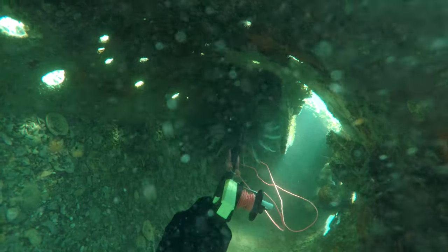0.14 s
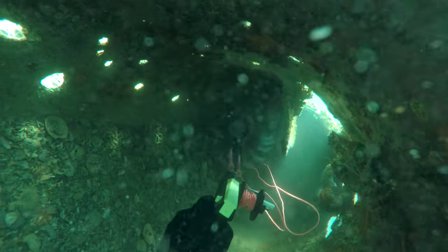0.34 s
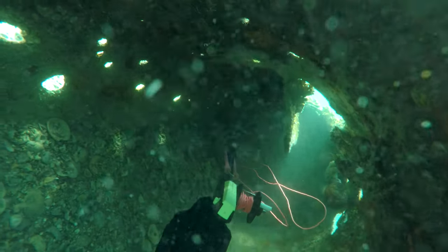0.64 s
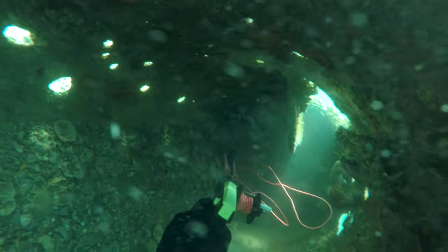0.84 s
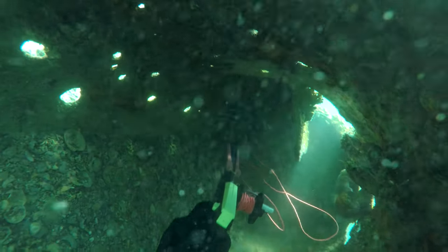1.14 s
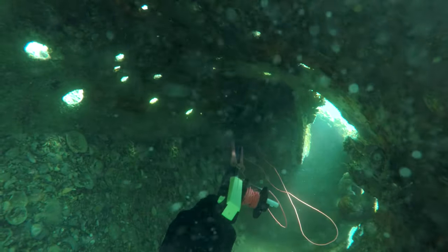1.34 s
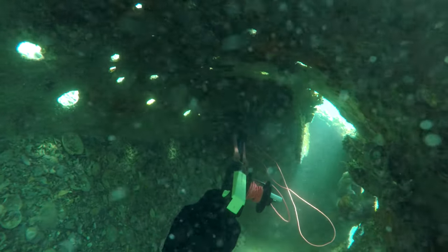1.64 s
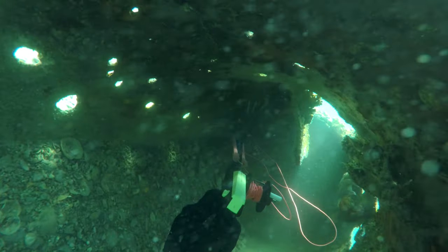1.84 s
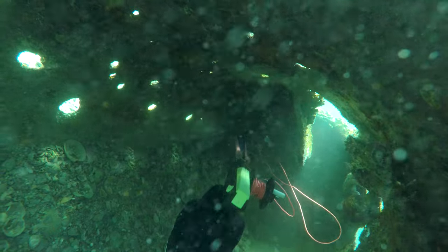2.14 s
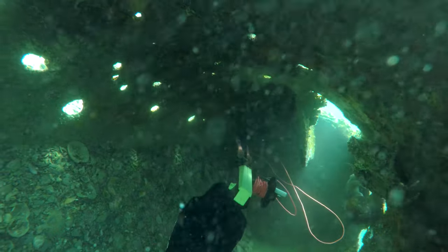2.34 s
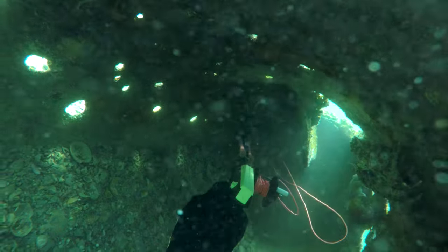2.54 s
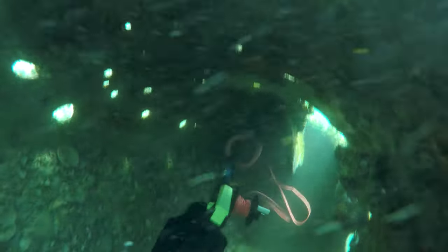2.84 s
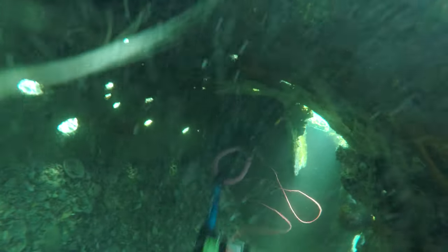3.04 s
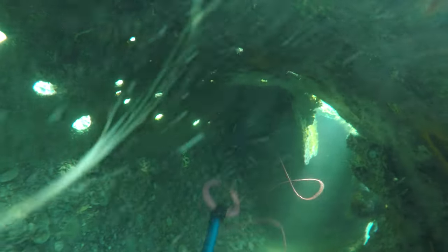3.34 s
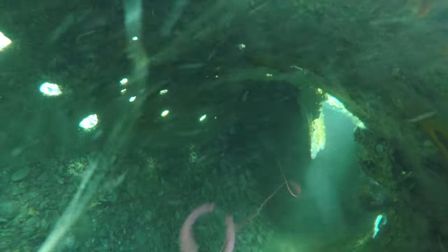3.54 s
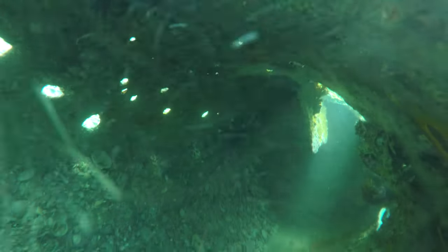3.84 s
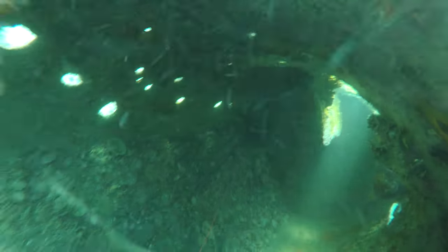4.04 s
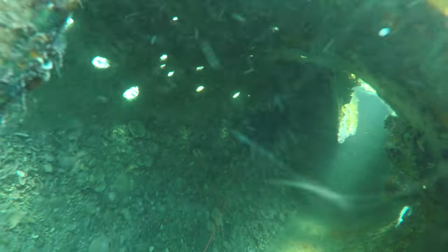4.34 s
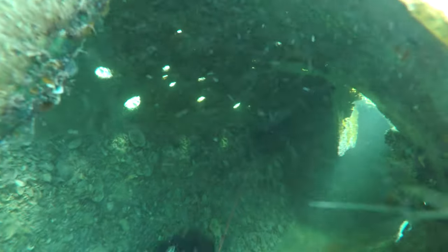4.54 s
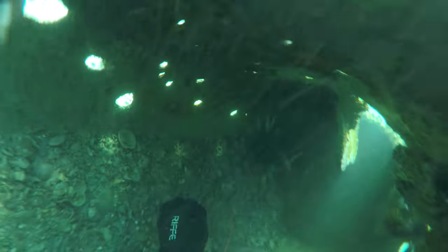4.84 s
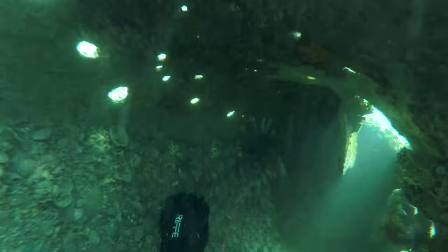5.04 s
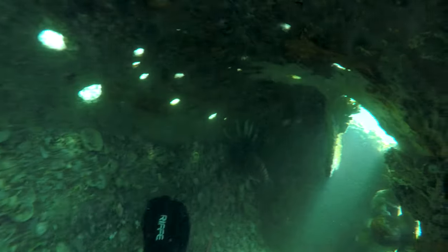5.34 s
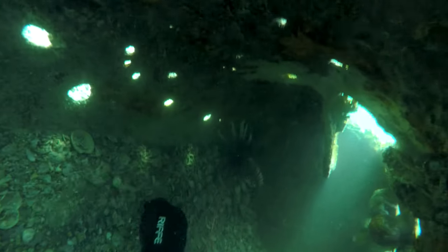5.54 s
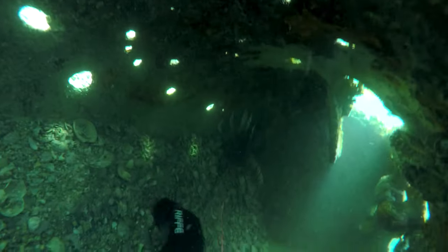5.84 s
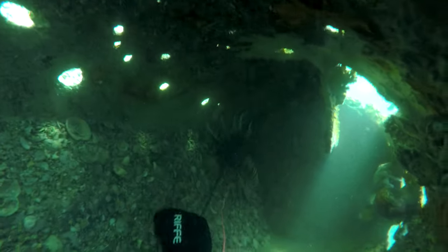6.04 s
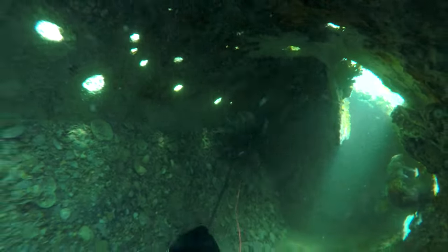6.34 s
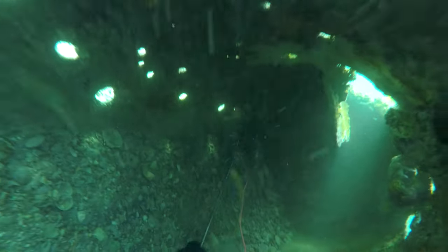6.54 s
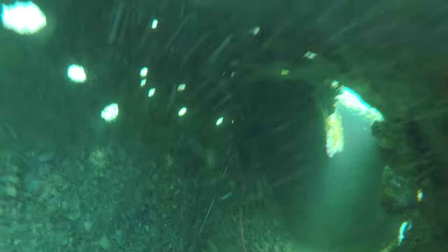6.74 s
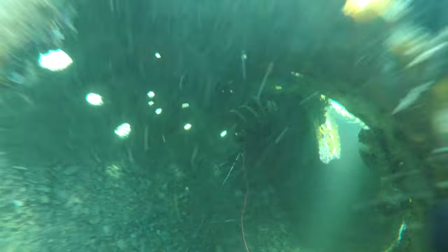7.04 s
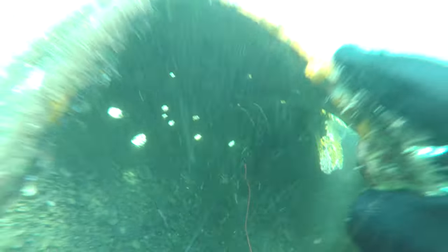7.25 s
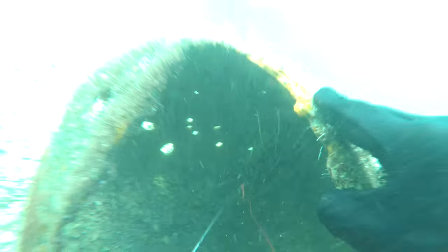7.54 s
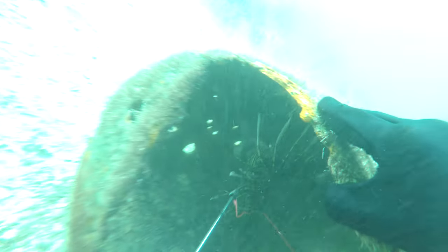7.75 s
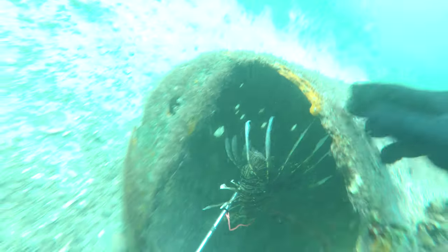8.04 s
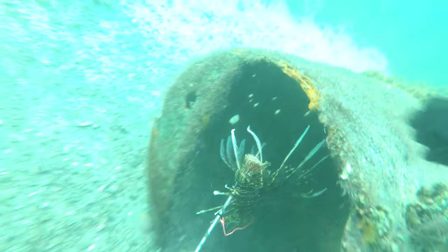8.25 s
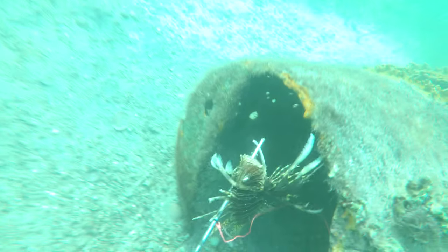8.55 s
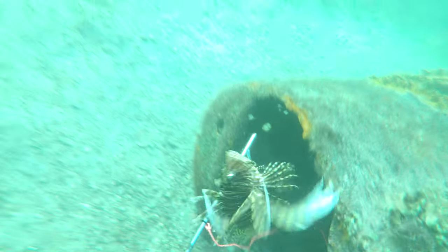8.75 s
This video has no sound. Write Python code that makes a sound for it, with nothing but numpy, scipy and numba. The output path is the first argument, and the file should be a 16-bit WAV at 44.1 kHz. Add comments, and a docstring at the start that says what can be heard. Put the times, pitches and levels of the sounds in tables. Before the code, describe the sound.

Muffled rattling engine drone heard through a diver's camera housing, split by one violent spear shot, followed by surging low water and scattered knocks.

```python
"""A boat engine idling nearby knocks and clatters, heard from inside a diver's camera housing at a sunken pipe.
Pulses of noise and short rings repeat each engine cycle and excite the housing's resonances; the sea crackles.
Filtered noise makes the rumble of water and the rubbing of gear; damped swings make throbs, knocks and squeaks.
Just after the sling's crack, the spear's impact is so loud that the camera's limiter ducks everything and lets
it back slowly; the spear rings on as decaying sine modes."""
import sys
import numpy as np
from scipy import signal
from scipy.fft import rfft, irfft
from scipy.io import wavfile
from scipy.ndimage import uniform_filter1d, minimum_filter1d
from numba import njit

SR = 44100
rng = np.random.default_rng(int(sys.argv[2]) if len(sys.argv) > 2 else 0)


def unload_wav(signal):
    """Save mono or channel-first audio to the path in sys.argv[1] as 16-bit WAV at rate SR, clipped to [-1, 1]."""
    wavfile.write(
        sys.argv[1],
        SR,
        np.round(np.clip(np.atleast_2d(signal).T, -1, 1) * 32767).astype(np.int16),
    )


N = 391608
TIME = np.arange(N) / SR
FREQ = np.fft.rfftfreq(N, 1 / SR) + 0.00081  # the offset keeps 0 Hz out of divisions and logarithms
SIDES = np.array([[.5], [-.5]])  # splits a difference evenly between left and right microphone


def undb(db):
    """Decibels to gain."""
    return 10 ** (np.asarray(db) / 20)


def curve(table, axis=1):
    """One column of a timed table, at every sample."""
    rows = np.array(table)
    return np.interp(TIME, rows[:, 0], rows[:, axis])


def unit(x):
    """Scale so that the middle of the stereo image has rms 1."""
    return x / np.std(np.atleast_2d(x).mean(axis=0))


def band(lo_hz, hi_hz, order=16):
    """Gain of a band-pass at every frequency; a higher order is steeper."""
    return 1 / np.sqrt((1 + (lo_hz / FREQ) ** order) * (1 + (FREQ / hi_hz) ** order))


def shape(x, response):
    """Filter by a frequency response."""
    return irfft(rfft(x) * response, N)


def add(track, s, sound):
    """Mix a sound in at time s."""
    i = max(int(s * SR), 0)
    track[i:i + len(sound)] += sound[:max(N - i, 0)]


def walk(rate):
    """Slow random wandering with a spread of 1, mostly below the rate in Hz."""
    slow = shape(rng.standard_normal(N), 1 / (1 + (FREQ / rate) ** 2) ** 2)
    return slow / np.std(slow)


def knock(hz, rise):
    """A few swings that swell and are quickly damped by the water."""
    t = TIME[:SR // 5]
    envelope = (t / rise) ** 2 * np.exp(2 - 2 * t / rise)
    return envelope * np.sin(2 * np.pi * hz * t)


# resonances of the housing at the two microphones:
# (centre [Hz], width [Hz], level [dB], left minus right [dB], phase by which left leads [rad])
HOUSING = [(314, 84, -24.2, -12.2, -1.4), (374, 113, -13.1, -2.8, 0.7), (516, 48, -3.2, -0.2, 0.8),
           (633, 113, -8.0, 3.1, -0.2), (756, 115, -10.6, -20.9, 3.1), (860, 38, -4, -8.7, 2.8),
           (945, 65, -6.2, -3.0, 2.6), (1028, 52, -3.3, -1.8, 2.3), (1219, 49, -13.8, -8.0, 2.7),
           (1560, 115, -7, 1.7, 2.6), (1680, 185, -5.3, -2.9, 2.0), (1950, 190, -14.5, 1.9, 2.2),
           (2150, 88, -8.5, -0.4, 1.7), (2329, 80, -10.5, -0.9, 1.3), (2485, 150, -16.5, 12, -0.3),
           (2688, 280, -20.2, -9.4, -2.0), (3168, 391, -27.6, 1.1, 1.1), (3744, 853, -28.2, -4.4, 0.5),
           (5313, 492, -35.5, -2.1, 1.5), (6251, 845, -39.3, -0.1, -4.6), (7397, 861, -38.6, 3.8, -1.5),
           (9226, 2608, -43.9, -6.1, -1.6), (12475, 1575, -58.1, 4.0, 4.5)]


def housing():
    """Left and right microphone responses: each resonance reaches them with its own strength and phase."""
    left, right, cross = 0, 0, 0
    grid = np.linspace(0, SR / 2, 4096)
    for hz, width, db, pan_db, lead in HOUSING:
        power = undb(db) ** 2 / (1 + 2 * ((grid - hz) / width) ** 2) ** 2
        left = left + power * undb(pan_db)
        right = right + power / undb(pan_db)
        cross = cross + power * np.exp(1j * lead)
    phase = np.unwrap(np.angle(cross))
    left, right, lead = (np.interp(FREQ, grid, v) for v in (left, right, phase))
    return np.sqrt([left, right]) * np.exp(1j * SIDES * lead)


# knocks within one engine cycle: (place in the cycle [0-1], length [cycles], body level [dB],
# clatter level [dB], treble level [dB], nominal ring [Hz], ring against noise [dB])
CYCLE = [(.003, 0.0061, -12, -10, 10.5, 4130, 8), (.075, 0.024, -7, 3, 13.5, 4470, -7.5),
         (.18, 0.024, 5, 6.5, 5.5, 2616, -4), (.28, 0.011, -4, 1, 3, 3900, 2),
         (.355, 0.014, 3, 7.5, 9, 2306, -4.5), (.41, 0.013, -3.5, 9.5, 12, 4210, 0.5),
         (.51, 0.031, 4, 3.5, 5.5, 2334, -2.5), (.62, 0.016, 1.5, -0.5, -10, 1680, 3),
         (.7, 0.025, 3, 3, 10, 3650, -17), (.815, 0.016, -1.5, 8, 11.5, 3743, 1.5),
         (.865, 0.014, 8, -0.5, 6.5, 2096, 1.5)]
BETWEEN_STROKES_DB = -5.5  # noise between the strokes, on the scale of the cycle's levels
# scatter of each stroke's time [cycles] and pitch [ratio], and how fast its ring rises [ratio per s]
STROKE_JITTER, STROKE_DETUNE, STROKE_GLIDE_PER_S = .003, .03, 12


def rattle(cycles, bend, ring_db, axis, scatter_db=1.1, repeat=0.55):
    """Noise flares with a short rising ring at each knock; strokes differ in exact time, size and pitch."""
    chance = rng.standard_normal((int(cycles[-1]) + 3, len(CYCLE), 4))
    power = np.full(N, undb(BETWEEN_STROKES_DB) ** 2)
    rings = np.zeros(N)
    cycle_s = TIME[-1] / cycles[-1]
    for k, row in enumerate(CYCLE):
        place, length, hz, own_ring_db = row[0], row[1], row[5], row[6]
        nearest = np.rint(cycles - place)
        offset = cycles - place - nearest
        near = np.abs(offset) < .2
        size, phase, late, pitch = chance[nearest[near].astype(int), k].T
        since = offset[near] - STROKE_JITTER * late
        stroke = undb(row[axis] + scatter_db * size) * np.exp(-(since / (2 * length)) ** 2)
        t = since * cycle_s
        ring_hz = hz * bend[near] * (1 + STROKE_DETUNE * pitch)
        turns = ring_hz * (t + STROKE_GLIDE_PER_S * t ** 2 / 2)
        power[near] += stroke ** 2
        rings[near] += undb(ring_db + own_ring_db) * stroke * np.sin(2 * np.pi * (turns + phase))
    # part of the noise repeats in every cycle, the rest is always new
    count = int(N / cycles[-1])
    same = rng.standard_normal(count)[(cycles % 1 * count).astype(int)]
    share = np.clip(repeat, 0, 1)
    noise = np.sqrt(share) * same + np.sqrt(1 - share) * rng.standard_normal(N)
    return rings + np.sqrt(power) * noise


# echoes off the pipe wall and the sea bed: (nominal delay [s], level [dB])
ECHOES = [(.0027, -10), (.0083, -12), (.0118, -14)]
# the drone's colour slides as the diver leaves the pipe:
# (time [s], pitch of the resonances [ratio], length of the echo paths [ratio])
SLIDE = [(0, 1.007, 1), (2.5, 0.9996, 1.024), (4.5, 1.004, .98), (6.5, 0.999, 1.01), (7.3, 0.992, .96),
         (8.2, 1.004, 1.007), (8.85, 0.972, 0.84)]


def echoes(x, sway=0.018):
    """Echo paths drift as the diver sways and shorten on the way out, so fine ridges slope through the drone."""
    path = curve(SLIDE, axis=2)
    out = x
    for delay, db in ECHOES:
        delays = delay * path * (1 + sway * walk(0.38))
        out = out + undb(db) * np.interp(TIME - delays, TIME, x)
    return out


def wavering(x, response, ratio):
    """Filter by a two-channel response whose resonances all slide by a pitch ratio, by bending time and back."""
    clock = np.cumsum(ratio)
    clock = clock * TIME[-1] / clock[-1]
    rung = shape(np.interp(TIME, clock, x), response)
    return np.array([np.interp(clock, TIME, side) for side in rung])


# the heavy knock of each cycle comes and goes as the diver moves:
# (time [s], level [dB], place in the cycle [0-1])
POUND = [(0, -24, .51), (.55, -14, .525), (1.1, -13.5, .52), (1.45, -27, .5), (1.85, -24, .51),
         (2.3, -13.5, .5), (3.3, -23, .49), (4.1, -20, .5), (4.6, -11.5, .505), (5.1, -14.5, .52),
         (5.7, -21.5, .5), (6.4, -15, .5), (7.1, -26, .53), (7.6, -27, .56), (8.15, -19, .58),
         (8.85, -21, .56)]
# the heavy knock and the weaker ones after it: (delay [cycles], level [dB])
POUND_STROKES = [(0, 0), (.115, -8), (.675, -9)]
POUND_HZ, POUND_RISE_S = 940, .002  # nominal pitch, time to the peak


def pounding(cycles, ears, scatter_db=2.0, detune=.025, pan_db=-5.5):
    """One heavy, hollow damped knock a cycle with its weaker followers: the beat of the idle."""
    out = np.zeros(N)
    times, levels, places = np.transpose(POUND)
    chance = rng.standard_normal((int(cycles[-1]) + 1, len(POUND_STROKES), 2))
    for k, strokes in enumerate(chance):
        now = np.interp(k + .5, cycles, TIME)
        db, place = np.interp(now, times, levels), np.interp(now, times, places)
        for (later, stroke_db), (size, pitch) in zip(POUND_STROKES, strokes):
            peak_s = np.interp(k + place + later, cycles, TIME, right=N / SR + 1)
            gain = undb(db + stroke_db + scatter_db * size)
            add(out, peak_s - POUND_RISE_S, gain * knock(POUND_HZ * (1 + detune * pitch), POUND_RISE_S))
    phase_only = ears / np.abs(ears)
    return shape(out, band(780, 1020, order=24) * phase_only) * undb(SIDES * pan_db)


# engine speed: (time [s], working cycles per second [Hz])
SPEED = [(0.0, 9.592), (1.0, 9.651), (2.0, 9.625), (3.0, 9.569), (4.0, 9.727), (5.0, 9.585), (6.0, 9.605),
         (7.0, 9.591), (8.0, 9.694), (9.0, 9.667)]
# the engine swells and fades as the diver moves, and brightens outside the pipe:
# (time [s], body level [dB], clatter level [dB])
DRONE = [(0, -34, -37.5), (.8, -32, -34.5), (1.85, -34.5, -40), (2.55, -31.5, -35.5), (3.1, -34, -39.5),
         (4.1, -35.5, -40.5), (4.7, -30, -39.5), (6.0, -32, -40), (6.5, -31, -37), (6.95, -36.5, -38.5),
         (7.6, -37.5, -35.5), (8.2, -31.5, -32.5), (8.85, -33.5, -32)]
# upper bands of the engine: (low edge [Hz], high edge [Hz], level against the clatter [dB],
# share of the body's swell [ratio], share of the clatter's swell [ratio])
UPPER = [(1122, 1535, -1.5, 0.65, 0.64), (1940, 3130, 1, 0.024, 1), (2604, 5360, -8, 0.03, 0.55)]
# the rattle's ring drifts, then slides down as the diver leaves the pipe: (time [s], pitch [ratio])
RATTLE_BEND = [(0, 0.98), (2.5, 0.98), (4.4, 0.95), (5.8, 1.04), (6.9, 1.01), (7.6, 0.95), (8.85, 0.73)]
# how strongly the strokes ring against their noise, before each knock's own share
BODY_RING_DB, CLATTER_RING_DB, TREBLE_RING_DB = -12, -8, -7.5
HUM_HZ, HUM_WIDTH_HZ, HUM_DB = 517, 83, -41.5  # a resonance that does not follow the drone's swells
SING_HZ, SING_WIDTH_HZ, SING_DB = 1660, 17, -11  # a narrow resonance, level against the clatter


def engine(ears, fizz_db=-62.0, waver_db=.5, drift=0.01):
    """Body, clatter, treble and heavy beat of the idling engine ring the housing; two resonances sound on."""
    cycles = np.cumsum(curve(SPEED)) / SR
    bend = curve(SLIDE) * (1 + drift * walk(1.8))
    body = echoes(rattle(cycles, bend, BODY_RING_DB, axis=2))
    clatter = echoes(rattle(cycles, bend, CLATTER_RING_DB, axis=3))
    treble = echoes(rattle(cycles, bend * curve(RATTLE_BEND), TREBLE_RING_DB, axis=4))
    body_db, clatter_db = curve(DRONE, axis=1), curve(DRONE, axis=2)
    body_swell = body_db - body_db.mean()
    clatter_swell = clatter_db - clatter_db.mean()
    layers = [(body, band(340, 1005), body_db)]
    for x, (low_hz, high_hz, db, with_body, with_clatter) in zip((clatter, clatter, treble), UPPER):
        swell_db = with_body * body_swell + with_clatter * clatter_swell
        layers.append((x, band(low_hz, high_hz), clatter_db.mean() + db + swell_db))
    hum = (HUM_HZ, HUM_WIDTH_HZ, HUM_DB)
    sing = (SING_HZ, SING_WIDTH_HZ, clatter_db + SING_DB)
    for hz, width, db in (hum, sing):
        layers.append((body, 1 / (1 + ((FREQ - hz) / width) ** 4), db))
    drone = 0
    for x, passed, db in layers:
        drone = drone + unit(wavering(x, ears * passed, bend)) * undb(db + waver_db * walk(1.6))
    fizz = unit(shape(treble, ears * band(5300, 10700))) * undb(fizz_db + clatter_swell)
    return pounding(cycles, ears) + drone + fizz


def crackle(ears, level_db=-58.5, spread_db=1.5):
    """Fine crackle of the sea: noise in grains of random size, different at each microphone."""
    sizes = np.repeat(rng.exponential(size=N // 32 + 1), 32)[:N]
    grains = rng.standard_normal((2, N)) * undb(spread_db * sizes)
    return unit(shape(grains, ears * band(5900, 18000))) * undb(level_db)


# water pushing on the housing as the diver settles, shoots and swims in:
# (time [s], level of the slow swells [dB], level of the eddies [dB])
FLOW = [(0, -28, -34.5), (1.0, -31, -37), (1.8, -37.5, -43), (2.5, -44.5, -48), (3.3, -28, -37),
        (3.7, -23, -36.5), (4.15, -23, -33), (4.75, -15.5, -34), (5.15, -24, -33.5), (7.2, -27.5, -34),
        (8.1, -24.5, -34), (8.85, -29, -33)]
# colour of that rumble: (frequency [Hz], level [dB])
FLOW_COLOUR = [(6, -20), (15, -1), (28, 0), (45, -4), (70, -11), (120, -21), (200, -29), (320, -38),
               (600, -60), (4000, -120)]


def flow(surge_db=-0.3):
    """Slow swells of low noise press on the housing as the diver moves, and smaller eddies churn along it."""
    hz, db = np.transpose(FLOW_COLOUR)
    colour = undb(np.interp(np.log(FREQ), np.log(hz), db))
    swells = unit(shape(rng.standard_normal(N), colour * band(2.8, 41.2)))
    eddies = unit(shape(rng.standard_normal(N), colour * band(50.3, 980)))
    return swells * undb(curve(FLOW) + surge_db * walk(4.2)) + eddies * undb(curve(FLOW, axis=2))


# gear, glove and line rubbing close to the housing, hardest at the shot: (time of the peak [s],
# level [dB], swell time constant [s], fade time constant [s], low edge [Hz], high edge [Hz])
RUBS = [(2.636, -13.5, 0.011, .012, 303, 745), (2.662, 13, 0.003, 0.014, 170, 700),
        (2.73, -14.5, 0.047, 0.05, 54.8, 250), (2.785, -20, 0.0063, 0.015, 175, 800),
        (2.795, -38, .012, 0.012, 1750, 2450), (2.785, -45, .012, .02, 6770, 9500),
        (2.92, -47.5, 0.038, .05, 6800, 9300), (3.2, -28.5, 0.23, 0.057, 270, 790),
        (3.212, -30.5, 0.025, 0.0072, 1750, 2490), (3.9, -28, 0.13, 0.17, 276, 740),
        (3.91, -27.5, 0.08, 0.03, 1650, 2120), (5.68, -31, 0.083, 0.081, 110, 496),
        (6.67, -27, .01, 0.05, 90, 260)]
GRIP_DB, GRIP_HZ = -45, 288  # the grip is never quite still


def rubbing(grip_db=3.5):
    """Rustle that catches and slips; each rub swells and fades over the faint, dull rustle of the grip."""
    friction = rfft(rng.standard_normal(N) * undb(grip_db * walk(38)))

    def rustle(low_hz, high_hz):
        """One band of the shared friction noise."""
        return unit(irfft(friction * band(low_hz, high_hz, order=8), N))

    out = undb(GRIP_DB) * rustle(GRIP_HZ / 2, GRIP_HZ * 2)
    for s, db, swell, fade, low_hz, high_hz in RUBS:
        away = np.maximum((s - TIME) / swell, (TIME - s) / fade)
        out = out + undb(db) * np.exp(-np.minimum(away, 20)) * rustle(low_hz, high_hz)
    return out


THROB_OVER_EDDIES_DB = 12.5  # a soft low throb grows with the eddies


def throb(throb_hz=9.8, pitch_hz=72, offbeat_db=-4.0, scatter_db=3.5):
    """Uneven low throb of damped swings, with a weaker beat in between."""
    out = np.zeros(N)
    times, _, eddies_db = np.transpose(FLOW)
    beats = np.arange(.012, N / SR, .5 / throb_hz)
    chance = rng.standard_normal((len(beats), 3))
    for k, (s, (size, pitch, late)) in enumerate(zip(beats, chance)):
        throb_db = np.interp(s, times, eddies_db) + THROB_OVER_EDDIES_DB
        db = throb_db + offbeat_db * (k % 2) + scatter_db * size
        add(out, s + .001 * late, undb(db) * knock(pitch_hz * np.exp(.15 * pitch), .003))
    return out


# faint stray ticks: mean rate, and the usual level, centre and decay
TICKS_PER_S, TICK_DB, TICK_HZ, TICK_T60_S = 0.99, -40.5, 6750, 0.0095


def stray_ticks():
    """Click rows at chance moments, within 2.5 dB and a quarter octave of the usual."""
    gaps, sizes, pitches = rng.uniform(-1, 1, (40, 3)).T
    times = np.cumsum(1 + .7 * gaps) / TICKS_PER_S
    rows = zip(times, TICK_DB + 2.5 * sizes, TICK_HZ * 2 ** (pitches / 4))
    return [(s, db, hz, .5, TICK_T60_S) for s, db, hz in rows if s < N / SR]


# sharp clicks and scrapes:
# (time [s], level before the housing's tint [dB], centre [Hz], spread [octaves], t60 [s])
CLICKS = [(.164, -25.5, 5550, 0.62, 0.025), (.64, -37, 7800, .3, .008), (2.618, -24, 3500, .57, 0.046),
          (2.628, 3, 5580, 0.5, 0.009), (2.6279, 0, 2330, 0.67, 0.03), (2.6285, -4.5, 8100, 0.24, 0.0052),
          (2.632, -17, 7000, 0.32, 0.069), (2.6443, -25, 7200, .4, .012), (2.657, 2, 2750, 0.28, 0.023),
          (2.661, 15.5, 1620, 0.25, .014), (2.658, -14, 5000, 0.55, .045), (2.731, -31, 7500, .15, .02),
          (2.777, -11, 2030, 0.22, 0.025), (2.796, -19, 2050, 0.22, 0.017), (3.185, -30, 2280, .3, 0.033),
          (3.211, -17.5, 2160, .25, 0.039), (3.211, -33, 7000, .3, .02), (3.407, -34, 6940, .57, .01),
          (3.4712, -15, 7400, 0.44, 0.011), (3.471, -15.5, 2500, .5, 0.012),
          (3.5333, -27, 7000, 0.53, .008), (4.257, -36, 6550, .57, .012), (7.7295, -22.5, 4960, .4, 0.008),
          (7.7294, -13, 2200, 0.46, .01), (7.7435, -32, 2300, 0.11, .025), (7.85, -27, 8000, 0.28, 0.011),
          (8.107, -30, 7400, 0.13, .008)]


def clicks(ears):
    """Hard contacts crack as brief noise bursts, tinted by the broad peaks and gaps of the housing."""
    out, t = np.zeros(N), TIME[:SR // 5]
    freq = np.fft.rfftfreq(len(t), 1 / SR) + 1
    lead = .002  # room before the onset for the filter to spread into
    for s, db, hz, octaves, t60 in CLICKS + stray_ticks():
        decay = (t >= lead) * np.exp(-np.log(1000) * (t - lead) / t60)
        burst = rng.standard_normal(len(t)) * decay
        colour = np.exp(-.5 * (np.log2(freq / hz) / octaves) ** 2)
        crack = irfft(rfft(burst) * colour, len(t))
        add(out, s - lead, undb(db) * crack / np.abs(crack).max())
    gain = np.abs(ears).mean(axis=0)
    return shape(out, uniform_filter1d(gain, size=2000) / uniform_filter1d(gain, size=9000))


# hollow knocks of the gear, loudest at the shot: (time [s], level [dB], pitch [Hz], rise time [s])
KNOCKS = [(0.168, -13, 127, 0.0019), (0.995, -19, 154, 0.0062), (2.613, -9, 153.2, 0.015),
          (2.6372, 1.5, 228, 0.0036), (2.6589, 22, 340, 0.00062), (2.751, -9, 520, 0.0018),
          (2.775, -9, 340, 0.0024), (2.796, -8.5, 260, 0.0018), (2.838, -13, 90, 0.0059),
          (3.543, -16, 520, 0.0022), (4.79, -27, 615, 0.0015), (5.429, -20.5, 153, 0.0074),
          (5.789, -13.5, 565, 0.0023), (6.189, -20, 146, 0.0036), (6.651, -3, 105, 0.0048),
          (6.678, -8, 109, 0.0029), (6.702, -23, 123.3, 0.028), (7.256, -21, 155, 0.0037),
          (7.284, -14, 78, 0.0025), (7.8508, 3.5, 415, 0.0018), (7.855, -5.5, 143, 0.0027),
          (8.045, -11, 108, 0.0035), (8.696, -13, 145, 0.00088)]


def gear_knocks():
    """The gear knocks close by: hollow swings, quickly damped."""
    out = np.zeros(N)
    for s, db, hz, rise in KNOCKS:
        add(out, s, undb(db) * knock(hz, rise))
    return out


# modes of the spear and its sling: (frequency [Hz], level [dB], t60 [s])
SPEAR = [(219, 5.5, 0.11), (292, 3.5, 0.12), (389, -3, 0.13), (568, -7, 0.13), (670, -9, 0.1),
         (800, -4, 0.05), (1070, -6, 0.057), (2240, -16.5, 0.12), (2560, -32, 0.1), (4440, -33, 0.11),
         (8700, -36, 0.1), (9458, -56, 0.1)]
# blows that ring the spear: (time [s], level [dB], lowest excited frequency [Hz])
SPEAR_HITS = [(2.66, 11, 99), (3.47, 8, 7130), (3.5334, 0.5, 7500)]


def spear():
    """The spear rings in decaying modes after the shot; light taps later reach mostly its highest modes."""
    out, t = np.zeros(N), TIME[:SR // 2]
    for s, db, low_hz in SPEAR_HITS:
        for hz, mode_db, t60 in SPEAR:
            excited = 1 / (1 + (low_hz / hz) ** 6)
            ring = np.exp(-np.log(1000) * t / t60) * np.sin(2 * np.pi * hz * t)
            add(out, s, excited * undb(db + mode_db) * ring)
    return out


# the slack line squeaks past the housing: (time [s], level [dB], pitch [Hz])
SQUEAKS = [(3.209, -11, 1920), (3.213, -15, 2350), (3.871, -21, 2030), (3.9, -14, 1980), (3.917, -22, 1970),
           (3.938, -4, 1710)]
SQUEAK_RISE_S = 0.0029


def line_squeaks():
    """Each catch of the slack line gives a short, high damped swing."""
    out = np.zeros(N)
    for s, db, hz in SQUEAKS:
        add(out, s, undb(db) * knock(hz, SQUEAK_RISE_S))
    return out


def scene(pan_db=-4.0, twist=1.96, treble_twist=0.17):
    """Low sounds move both microphones together; higher up the housing flexes and sets them against each other."""
    ears = housing()
    # phase in radians by which the left microphone leads
    lead = twist * band(410, 3300, order=4) - treble_twist * band(6000, 14000, order=4)
    contact = undb(SIDES * pan_db) * np.exp(1j * SIDES * lead)
    distant = engine(ears) + crackle(ears)
    close = flow() + rubbing() + throb() + clicks(ears) + gear_knocks() + spear() + line_squeaks()
    return distant + shape(close, contact)


@njit
def limiter(peak, ceiling, hold, creep, release):
    """Gain that drops when the sound passes the ceiling, recovers at one rate for a hold, then at another."""
    gains, gain, wait = np.empty(len(peak)), 1., 0.
    for i in range(len(peak)):
        if peak[i] * gain > ceiling:
            gain, wait = ceiling / peak[i], hold
        else:
            gain = min(1., gain * (creep if wait > 0 else release))
            wait -= 1
        gains[i] = gain
    return gains


TOP_HZ = 14400  # the camera passes nothing much above this


def record(dry, ceiling=1.0, overshoot_db=7, hold_s=0.61, creep_db_per_s=10.5, release_db_per_s=10.5,
           quick_db_per_s=42):
    """The camera's limiter looks a millisecond ahead: a slow stage ducks, a quick one takes the overshoot."""
    peak = -minimum_filter1d(-np.abs(dry).max(axis=0), size=89)
    rates = (creep_db_per_s, release_db_per_s, quick_db_per_s)
    creep, release, quick = (float(undb(rate / SR)) for rate in rates)
    gain = limiter(peak, float(ceiling * undb(overshoot_db)), float(hold_s * SR), creep, release)
    gain = gain * limiter(peak * gain, float(ceiling), 0., quick, quick)
    limited = dry * uniform_filter1d(gain, size=89)
    top_cut = signal.ellip(10, .2, 100, TOP_HZ, fs=SR, output="sos")
    return signal.sosfilt(top_cut, limited)


dry = scene()
out = record(dry)
unload_wav(out)
```